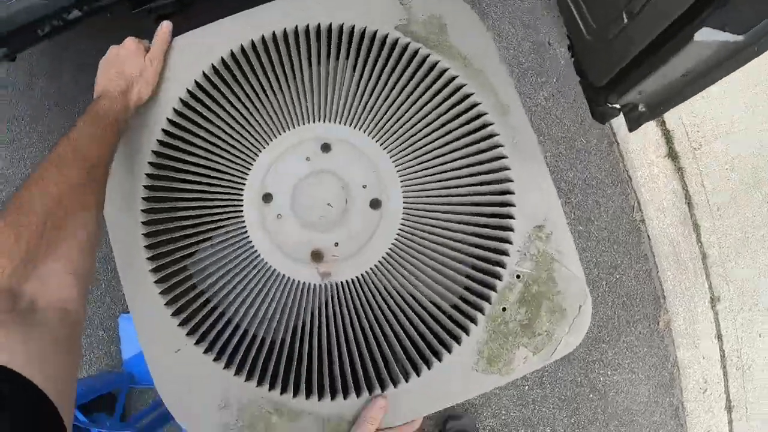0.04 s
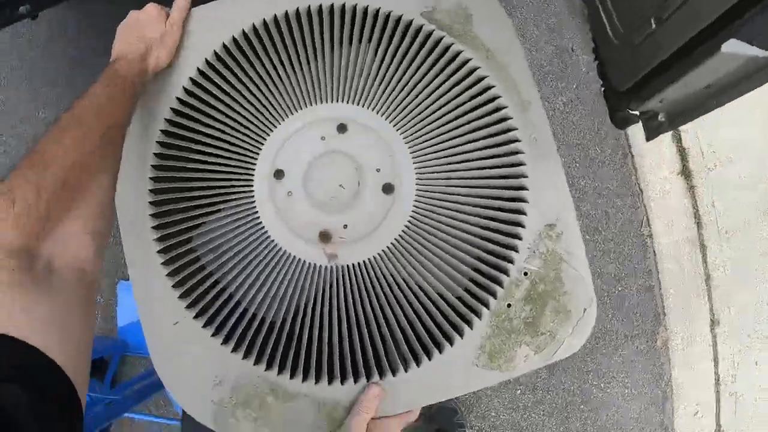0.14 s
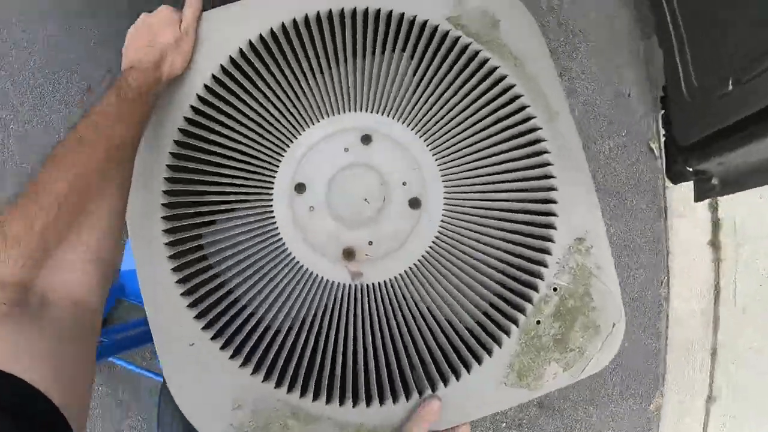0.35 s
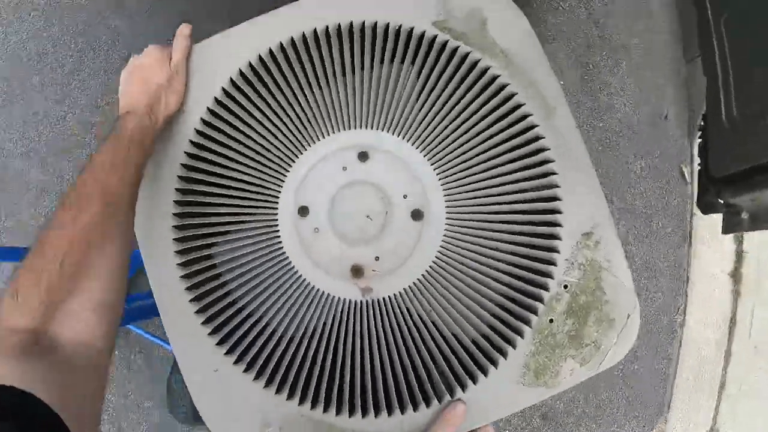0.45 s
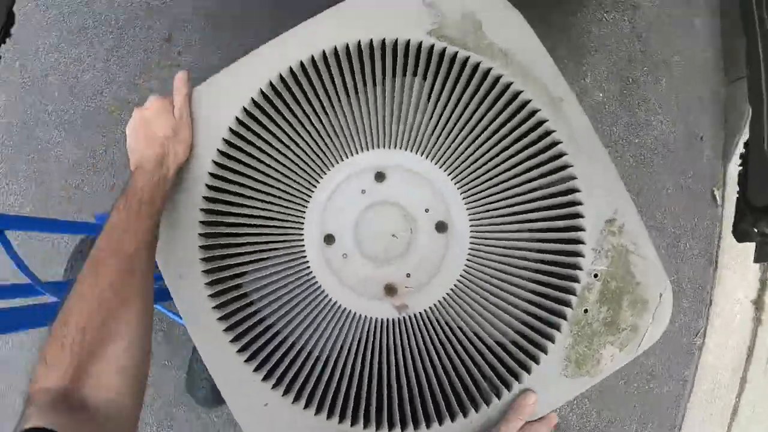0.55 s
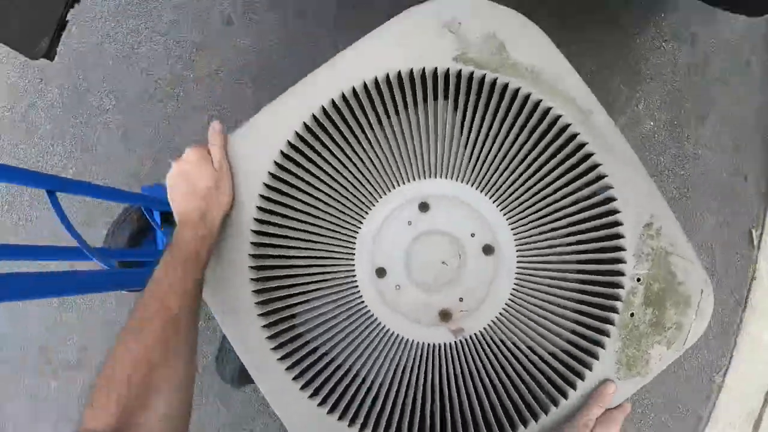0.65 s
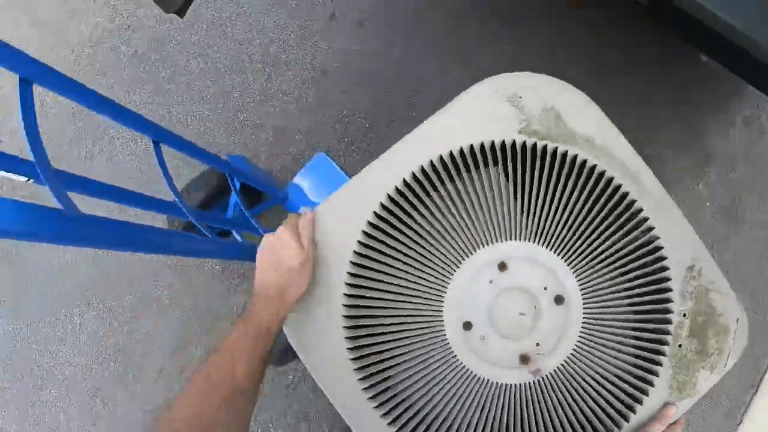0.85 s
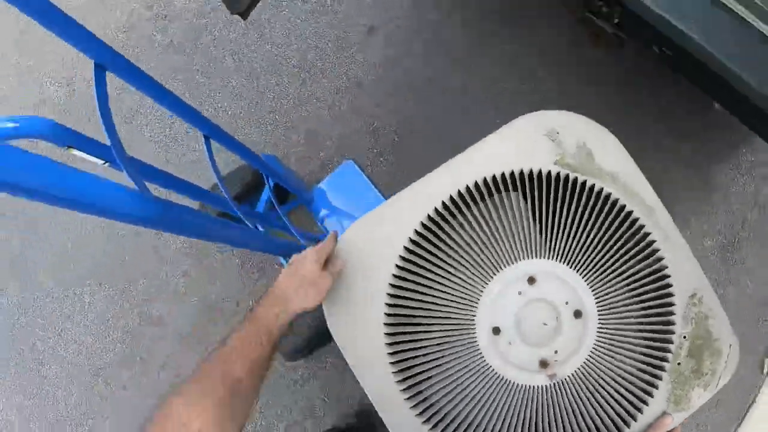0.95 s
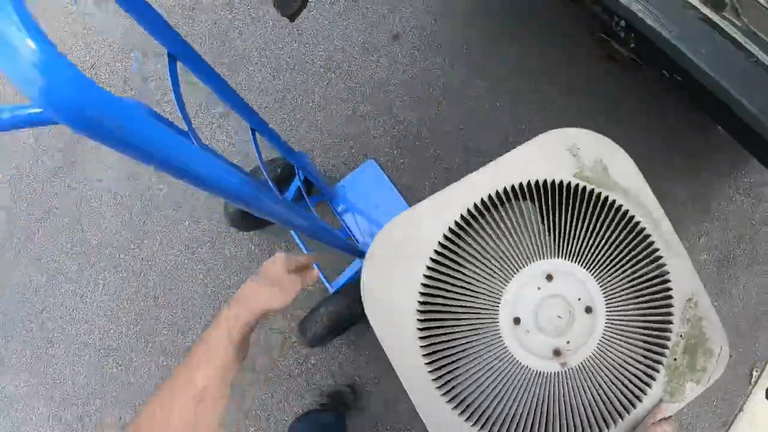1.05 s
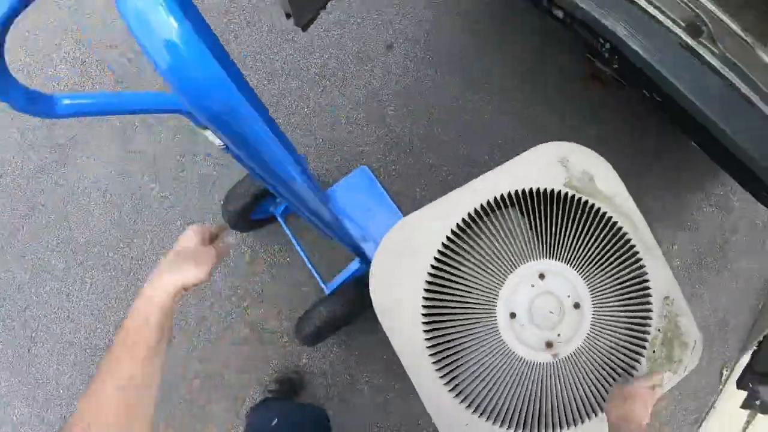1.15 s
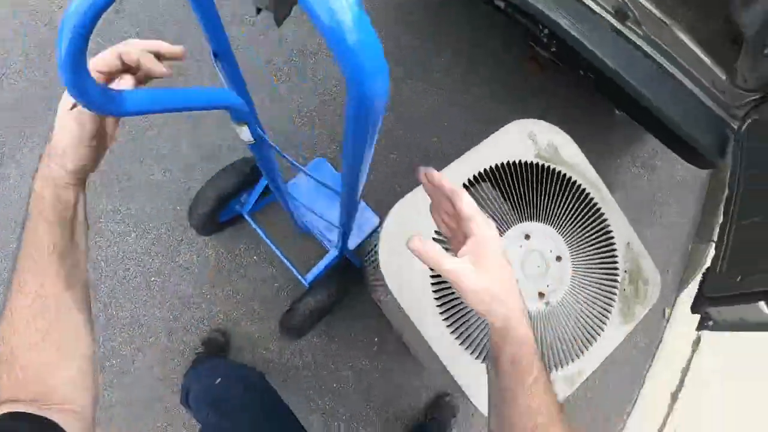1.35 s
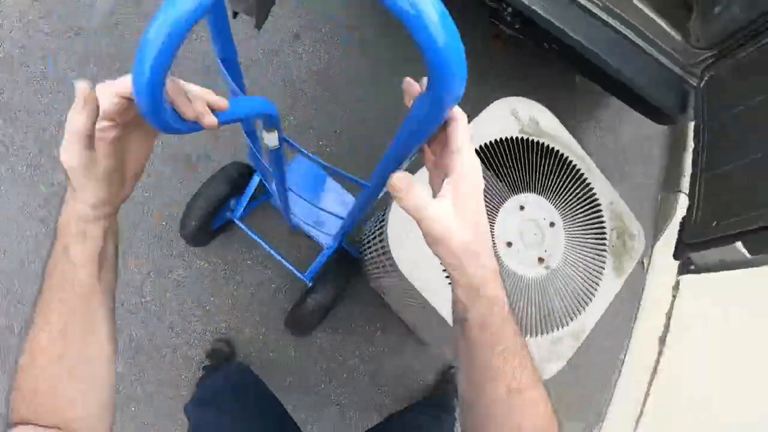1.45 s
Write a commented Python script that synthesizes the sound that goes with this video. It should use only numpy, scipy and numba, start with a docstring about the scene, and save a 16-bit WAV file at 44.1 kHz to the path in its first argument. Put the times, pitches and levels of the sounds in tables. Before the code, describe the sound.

Hollow metal box judders and groans across a gritty driveway, then clanks and settles, leaving quiet

```python
"""A bird's short falling whistle over light wind, then a hollow sheet-metal cabinet dragged over a gritty
driveway onto a steel hand truck, close to a small camera with two microphone ports. The cabinet is ringing
modes driven by random clicks and hard bumps, its groans are gliding tones, grit is dense coloured grains,
the frame clanks in its own modes, the load thuds in low damped tones; faint rustles and ticks follow.
Behind them lie the bird's gliding tones and their echo, and wind and a quiet street of shaped noise."""
import sys
import numpy as np
from scipy import signal
from scipy.fft import rfft, irfft, next_fast_len
from scipy.io import wavfile
from scipy.ndimage import uniform_filter1d
from numba import njit

SR = 44100
rng = np.random.default_rng(int(sys.argv[2]) if len(sys.argv) > 2 else 0)


def dump_mix(stems):
    """Bounce the given channels to the path in sys.argv[1] as a 16-bit WAV at rate SR."""
    frames = np.atleast_2d(stems).T  # one column per channel
    limited = np.clip(frames, -1, 1)  # hard clip at full scale
    pcm = np.round(limited * 32767).astype(np.int16)
    wavfile.write(sys.argv[1], SR, pcm)


def makeup_ratio(level_db):
    """Linear amplitude ratio for a level in decibels (20 dB per factor of ten)."""
    decades = np.asarray(level_db, float) / 20
    return 10 ** decades


N = 66150
T = np.arange(N) / SR  # s
M = next_fast_len(N + SR // 2)  # transform length, with room for filter tails
HZ = np.maximum(np.arange(M // 2 + 1) * SR / M, 1)


def unit(x):
    """Scale to rms 1."""
    return x / np.sqrt(np.mean(x ** 2))


def over_hz(table):
    """Second column of a table, read on a log-frequency axis."""
    a = np.array(table, float)
    return np.interp(np.log(HZ), np.log(a[:, 0]), a[:, 1])


def over_t(table, axis):
    """One column of a curve in time, read at every sample."""
    a = np.array(table, float)
    return np.interp(T, a[:, 0], a[:, axis])


def shape(x, gain):
    """Apply a gain per frequency."""
    return irfft(rfft(x, M) * gain, M)[:N]


def conv(x, h):
    """Convolution, cut to length."""
    return signal.fftconvolve(x, h)[:N]


def band(x, order, low_hz, high_hz):
    """Band-pass filter."""
    return signal.sosfilt(signal.butter(order, [low_hz, high_hz], "band", fs=SR, output="sos"), x)


def decay(t60):
    """Unit-energy burst of noise that falls 60 dB in t60 seconds, cut after a third of a second."""
    t = T[:SR // 3]
    h = rng.standard_normal(len(t)) * np.exp(-np.log(1000) * t / t60)
    return h / np.sqrt(np.sum(h ** 2))


def grains(per_s, scatter_db):
    """Random clicks of either sign, a few much stronger than the rest."""
    chance, sign, strength = rng.random((N, 3)).T
    clicks = (chance < per_s / SR) * np.sign(sign - .5)
    return unit(clicks * makeup_ratio(-scatter_db * np.log(1 - strength)))


def scatter(per_s, colour):
    """Dense grains in a given colour, each smeared over a short tail that leaves the colour alone."""
    h = rfft(decay(0.0016), M)
    return shape(grains(per_s, 1.5), makeup_ratio(over_hz(colour)) * h / np.abs(h))


def walk(rate):
    """Slow random wander with rms 1, from rate random values per second, smoothed twice."""
    k = int(SR / rate)
    steps = np.repeat(rng.standard_normal(N // k + 1), k)
    return unit(uniform_filter1d(uniform_filter1d(steps, k), k)[:N])


@njit
def ring(x, hz, fade):
    """One damped mode, a rotating phasor driven by x, whose pitch may move."""
    y, z = np.empty(len(x)), 0j
    for i in range(len(x)):
        z = z * fade * np.exp(2j * np.pi * hz[i] / SR) + x[i]
        y[i] = z.imag
    return y


def modes(x, hz, table):
    """A set of modes at multiples of hz."""
    return sum(makeup_ratio(db) * ring(x, k * hz, np.exp(-np.log(1000) / (t60 * SR))) for k, db, t60 in table)


def cabinet():
    """Random judder and the hardest bumps ring the hollow cabinet close by."""
    # judder of the dragged cabinet: (time [s], level before the trim [dB], boom pitch [Hz],
    # upper modes' gain [dB])
    drag = [(0.0, -48.5, 274, -4.5), (0.066, -49.5, 316, 3), (0.104, -30, 301, 4), (0.17, -25.5, 350, -2),
            (0.204, -21.5, 334.5, 9.5), (0.264, -22.5, 362, 5), (0.276, -12.5, 351, 3.5),
            (0.334, -21.5, 329, 4.5), (0.372, -18, 329, 9.5), (0.386, -19.5, 335, -12),
            (0.408, -13, 321, -1.5), (0.458, -10.5, 310, 4.5), (0.48, -8, 322, -1),
            (0.492, -13.5, 334, 3.5), (0.576, -16.5, 294, 4.5), (0.634, -14.5, 306, 8),
            (0.66, -28, 308, 4.5), (0.7, -17.5, 300, 2.5), (0.738, -11.5, 302, 3.5),
            (0.786, -24.5, 269, -3.5), (0.814, -18, 291, -3.5), (0.864, -37, 338, 2.5),
            (0.888, -29.5, 296, -3), (0.918, -41, 298, 3), (0.96, -29, 308, -3.5), (0.99, -44, 297, -2.5),
            (1.235, -47.5, 291, 10.5), (1.5, -47, 296, -2)]
    # hardest bumps: (time [s], peak level [dB], boom pitch [Hz], upper modes' gain [dB],
    # ring time factor [ratio, at least 0.2 is used])
    bumps = [(0.104, -24, 288, 31, 0.59), (0.269, -13, 363.6, 2, 0.86), (0.314, -17, 350, 5.5, 0.79),
             (0.338, -13.5, 328.7, -20, 1), (0.404, -5.5, 388, -10, 0.31), (0.4181, -6, 304, 3.5, 0.31),
             (0.426, -11, 268, 7.5, 1.0), (0.435, -9.5, 303.5, -10, 0.7), (0.475, -2.5, 436, -3, 0.19),
             (0.517, -20, 270, 3, 0.33), (0.53, -14.5, 323, 4, 0.21), (0.586, -11.5, 327, 5, 0.94),
             (0.669, -8, 280.5, 3.5, 0.68), (0.692, -11.5, 286, 4.5, 1), (0.758, -4, 289, -1, 0.45),
             (0.949, -21.5, 301, -5.5, 0.67), (1.086, -35.5, 289, -23, 1.0)]
    trim_db = -6.5
    out = unit(boom(grains(1500, 2.5), over_t(drag, axis=2), over_t(drag, axis=3), 0.61))
    out = out * makeup_ratio(over_t(drag, axis=1) + trim_db)
    for start, db, hz, upper_db, stretch in bumps:
        i, tap = int(start * SR), np.zeros(SR // 8)
        tap[0] = 1
        bump = boom(tap, np.full(len(tap), 1. * hz), upper_db, max(stretch, .2))
        out[i:i + len(tap)] += makeup_ratio(db) * bump / np.abs(bump).max()
    return out


def boom(x, hz, upper_db, stretch):
    """The cabinet's two lowest modes plus its upper ones; everything below about 230 Hz is removed."""
    # cabinet modes, lowest two first: (multiple of the boom pitch [ratio],
    # gain before upper_db [dB], t60 before the stretch [s])
    cabinet_modes = [(.7, -3, 0.072), (1.0, 9, 0.13), (1.27, 3, 0.042), (1.6, 5, 0.051), (1.9, -7.5, 0.082),
                     (2.15, -3.5, 0.057), (2.7, -11, 0.033), (3.6, -23, 0.046)]
    table = [(k, db, t60 * stretch) for k, db, t60 in cabinet_modes]
    force = push(x)[:len(x)]
    y = modes(force, hz, table[:2]) + makeup_ratio(upper_db) * modes(force, hz, table[2:])
    return signal.sosfilt(signal.butter(4, 230.4, "high", fs=SR, output="sos"), y)


def push(x):
    """Each click becomes a soft contact whose force peaks after push_s and dies away."""
    push_s = 0.00024
    t = T[:SR // 100] / push_s
    h = t * np.exp(-t)
    return conv(x, h / h.sum())


def groans():
    """Stick-slip: the base slips in step with the boom, in wavering tones that swell and are choked off."""
    # groans: (start [s], length [s], peak level before roughness [dB],
    # first pitch [Hz], last pitch [Hz], both before the waver)
    groan_notes = [(0.2, .016, -16.5, 330, 347.5), (0.361, .019, -12, 320, 326),
                   (0.589, 0.0413, -18, 575, 494), (.602, 0.019, -13.5, 275, 288),
                   (0.618, 0.0297, -11, 300, 306), (0.697, 0.031, -13.5, 280, 291),
                   (0.802, 0.016, -24, 300, 294)]
    rise_share, stop_s, rough_db = 0.37, 0.0032, 1.6  # rise as a share of the length
    out, waver = np.zeros(N), 1 + 0.0302 * walk(90.5)
    for start, length, db, hz0, hz1 in groan_notes:
        u = np.clip((T - start) / length, 0, 1)
        choke = np.exp(-np.maximum(T - start - length, 0) / stop_s)
        env = np.minimum(u / rise_share, 1) * choke
        hz = (hz0 + (hz1 - hz0) * u) * waver
        out += makeup_ratio(db) * env * np.sin(2 * np.pi * np.cumsum(hz) / SR)
    return out * makeup_ratio(rough_db * walk(120))


def grit():
    """Grains crushed and scraped under the steel base; the thin panels ring with them as a noisy tail."""
    # grit under the base: (time [s], level before treble gain and chatter [dB],
    # treble gain, mostly above 2400 Hz [dB])
    scrape = [(0.0, -83, -4), (0.04, -66, 9), (0.094, -51, 0), (0.168, -53, -3.5), (0.194, -42, -14.5),
              (0.324, -38, -5), (0.334, -31.5, -9), (0.37, -37.5, -3.5), (0.404, -31, -2.5),
              (0.42, -34, -2), (0.444, -28.5, -1.5), (0.51, -36.5, -6), (0.576, -31, -3),
              (0.742, -32.5, -2.5), (0.802, -42.5, -2.5), (0.82, -52.5, 15), (0.832, -41, 6),
              (0.898, -53, 3), (1.03, -58, -16)]
    # colour of the grains: (frequency [Hz], relative density [dB per Hz])
    grit_colour = [(410, -9.5), (700, -3), (807, 0), (993, -4.5), (1060, -3), (1430, -4.5), (1710, -10.5),
                   (2080, -9.5), (2950, -11.5), (4460, -18.5), (5710, -11.5), (7590, -20), (9100, -33),
                   (13600, -38), (15500, -45)]
    chatter_db, fade_s = 1.25, 0.0096
    panel_ring_db, panel_t60_s = -5, 0.093
    x = scatter(5000, grit_colour)
    x = x / np.std(shape(x, (HZ > 1500) & (HZ < 8000)))  # level is set in this band
    treble = shape(x, HZ ** 2 / (HZ ** 2 + 2400.0 ** 2))
    x = x + treble * (makeup_ratio(over_t(scrape, axis=2)) - 1)
    x = x * makeup_ratio(over_t(scrape, axis=1) + chatter_db * walk(250))
    x = x * np.clip((scrape[-1][0] - T) / fade_s, 0, 1)
    return x + makeup_ratio(panel_ring_db) * conv(x, decay(panel_t60_s))


def frame():
    """Each clank of the steel frame chatters briefly into its modes, with a noisy clack."""
    # clanks: (time [s], peak level of the ringing [dB])
    clanks = [(0.4, -27.5), (0.4724, -32), (0.8271, -18)]
    # frame modes: (frequency [Hz], gain [dB], t60 [s])
    frame_modes = [(1064, 6, 0.056), (1180, 1.5, 0.015), (1330, 5, 0.12), (1480, 0, 0.15),
                   (2070, -1.5, 0.11), (1810, -6, .06), (2750, -20, 0.045), (3130, -20, 0.18),
                   (5040, -29, 0.17), (6150, -8, 0.095)]
    chatter_t60_s, clack_t60_s = .012, 0.084
    clack_db, clack_hz = 0.5, 1434  # clack's peak relative to the ringing
    out = np.zeros(N)
    for start, db in clanks:
        i, hit, clack = int(start * SR), np.zeros(N), np.zeros(N)
        h = decay(chatter_t60_s)
        hit[i:i + len(h)] = h
        clack[i:i + len(h)] = decay(clack_t60_s)
        ringing = modes(hit, np.ones(N), frame_modes)
        clack = band(clack, 3, clack_hz / 1.8, clack_hz * 1.46)
        out += makeup_ratio(db) * ringing / np.abs(ringing).max()
        out += makeup_ratio(db + clack_db) * clack / np.abs(clack).max()
    return out


def thud():
    """The load settles in low damped tones with a soft start."""
    # thuds: (start [s], level before the soft start and decay [dB], frequency [Hz], t60 [s])
    thuds = [(0.789, -34.5, 107.8, 0.48), (0.816, -36, 51, 0.2), (.9, -34, 140, 0.26)]
    out = np.zeros(N)
    for start, db, hz, t60 in thuds:
        t = np.maximum(T - start, 0)
        env = (1 - np.exp(-t / .01)) * np.exp(-np.log(1000) * t / t60)
        out += makeup_ratio(db) * env * np.sin(2 * np.pi * hz * t)
    return out


def ticks():
    """Small ticks and scuffs: short bursts of decaying noise, filtered around one pitch."""
    # ticks: (time [s], peak level [dB], pitch [Hz])
    tick_list = [(.338, -25.5, 1750), (.398, -29, 4340), (.473, -27, 4600), (1.064, -58, 4850),
                 (1.066, -43.5, 2900), (1.104, -44, 2720), (1.21, -43, 760), (1.297, -41, 476)]
    t60_cycles = 13.8  # cycles of the pitch in which the noise falls 60 dB
    out = np.zeros(N)
    for start, db, hz in tick_list:
        i, h = int(start * SR), decay(t60_cycles / hz)
        h = band(h, 2, hz / 1.1, hz * 1.2)[:SR // 8]
        out[i:i + len(h)] += makeup_ratio(db) * h / np.abs(h).max()
    return out


def rustle():
    """Faint fine-grained rubbing after the drag, made of very dense grains."""
    # rustle: (time [s], level [dB])
    rustle_level = [(1.03, -89), (1.056, -57), (1.064, -53.5), (1.11, -52.5), (1.155, -65.5), (1.28, -90),
                    (1.29, -58), (1.335, -77), (1.41, -65), (1.5, -55.5)]
    # its colour: (frequency [Hz], relative density [dB per Hz])
    rustle_colour = [(500, -2), (900, -6), (1700, -5.5), (2700, -2.5), (4000, -10), (5200, -4.5),
                     (7000, -11.5), (9000, -35.5)]
    return unit(scatter(11000, rustle_colour)) * makeup_ratio(over_t(rustle_level, axis=1))


def bird():
    """Short gliding whistles and their diffuse echo off the houses."""
    # bird notes: (start [s], length [s], rms level before the envelope [dB],
    # first pitch [Hz], last pitch [Hz])
    notes = [(-.004, 0.024, -37, 5800, 3580), (0.08, 0.017, -52.5, 4040, 4450),
             (1.242, 0.017, -64, 4410, 4520), (1.284, 0.037, -65, 5500, 5450)]
    echo_db, echo_t60_s, bend = -3.5, 0.42, 2.7  # bend above 1: the glide comes late in the note
    out = np.zeros(N)
    for start, length, db, hz0, hz1 in notes:
        u = np.clip((T - start) / length, -1, 1)
        after = np.maximum(u, 0)
        hz = hz0 + (hz1 - hz0) * after ** bend
        env = np.clip((u + 0.11) / .3, 0, 1) * (1 - after ** 2)
        out += makeup_ratio(db) * np.sqrt(2) * env * np.sin(2 * np.pi * np.cumsum(hz) / SR)
    return out + makeup_ratio(echo_db) * conv(out, decay(echo_t60_s))


def wind():
    """Low buffeting on the microphone ports, as shaped noise; the deepest part differs between them."""
    # wind: (time [s], level before the small wander [dB])
    wind_level = [(0.0, -32.5), (0.104, -37), (0.216, -35.5), (0.466, -42), (0.496, -42), (0.53, -43),
                  (0.684, -66), (0.834, -33.5), (0.86, -43), (1.122, -47.5), (1.178, -46.5), (1.24, -50.5),
                  (1.412, -35), (1.436, -45.5), (1.5, -40.5)]
    # its colour: (frequency [Hz], relative density [dB per Hz])
    wind_colour = [(8.8, -38), (15, 5), (65, -6), (113, -9), (140, -3), (167, -20.5), (190, -5.5),
                   (250, -25), (420, -120)]
    pan_db, alike_above_hz = -3.5, 36  # pan: left minus right
    like = 1 / (1 + (alike_above_hz / HZ) ** 3)
    colour = makeup_ratio(over_hz(wind_colour))
    mid = shape(rng.standard_normal(N), colour * np.sqrt((1 + like) / 2))
    side = shape(rng.standard_normal(N), colour * np.sqrt((1 - like) / 2))
    both = np.array([(mid + side) * makeup_ratio(pan_db / 2), (mid - side) * makeup_ratio(-pan_db / 2)])
    return unit(both) * makeup_ratio(over_t(wind_level, axis=1) + 0.22 * walk(12))


def street():
    """Distant traffic and air: shaped noise in octave bands from 64 Hz, each flickering a little."""
    # street colour: (frequency [Hz], relative density [dB per Hz])
    street_colour = [(65, -54.5), (110, 0), (194, -13.5), (330, -4), (480, -23.5), (700, -16),
                     (1180, -19.5), (1330, -23.5), (1470, -23.5), (4500, -35), (5690, -32.5),
                     (12000, -67.5), (15600, -103), (22000, -120)]
    level_db = -49
    out, x = 0, unit(shape(rng.standard_normal(N), makeup_ratio(over_hz(street_colour))))
    for k in range(6, 14):
        octave = shape(x, (HZ >= 2 ** k) & (HZ < 2 ** (k + 1)))
        out = out + octave * makeup_ratio(0.4 * walk(32.0))
    return out * makeup_ratio(level_db)


def ports(x, other):
    """What both ports share, plus what reaches them from scattered places and differs."""
    # likeness of the two ports: (frequency [Hz], likeness [0-1])
    likeness = [(130, 0.66), (290, 0.94), (640, 0.36), (1410, 0.44), (3100, 0.77), (6000, 0.4),
                (8500, 0.042)]
    # level balance: (frequency [Hz], left minus right [dB])
    balance = [(60, -5.5), (110, 5), (200, -2.5), (380, -3), (700, -5.5), (1290, -1.5), (2380, -0.5),
               (4400, -3), (8120, 3.5), (15000, 1.0)]
    # phase between the ports: (frequency [Hz], left leads by [rad])
    lead = [(100, 0), (300, 0), (520, -.2), (1210, 1.1), (2500, -.2), (5500, .3), (7600, 0)]
    like = np.clip(over_hz(likeness), 0, 1)
    same, diff = np.sqrt((1 + like) / 2), np.sqrt((1 - like) / 2)
    tilt = makeup_ratio(over_hz(balance) / 2) * np.exp(.5j * over_hz(lead))  # half for each port
    left = shape(x, same * tilt) + shape(other, diff * tilt)
    right = shape(x, same / tilt) - shape(other, diff / tilt)
    return np.array([left, right])


def wide():
    """The sources that differ between the ports, with fresh random draws at every call."""
    return grit() + rustle() + street() + frame()


def scene():
    """All sources at the two ports."""
    shared = cabinet() + groans() + thud() + ticks() + bird()
    return ports(shared + wide(), wide()) + wind()


def roll_off(x):
    """The treble ends steeply here."""
    return signal.sosfilt(signal.butter(12, 15630, fs=SR, output="sos"), x)


def record(dry):
    """The finished mix of both ports, as the camera keeps it."""
    return roll_off(dry)


dry = scene()
out = record(dry)
dump_mix(out)
```